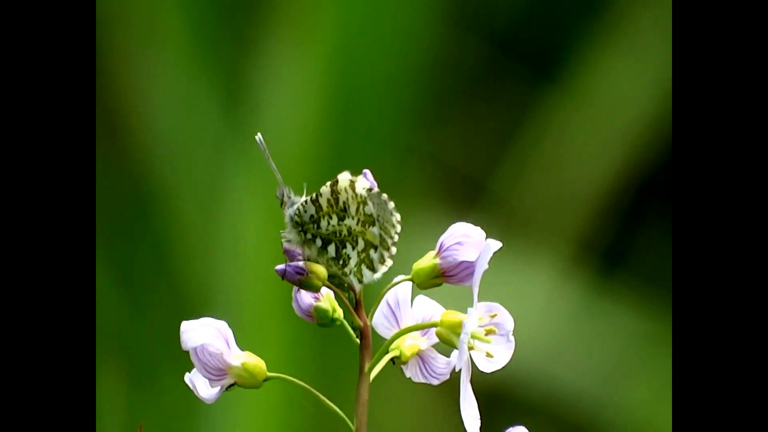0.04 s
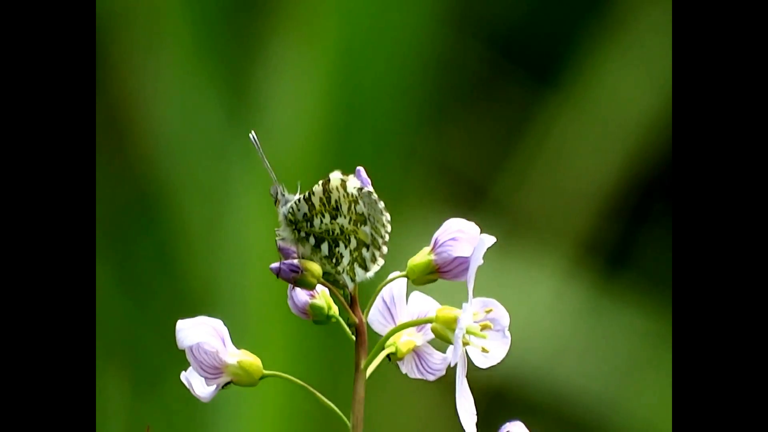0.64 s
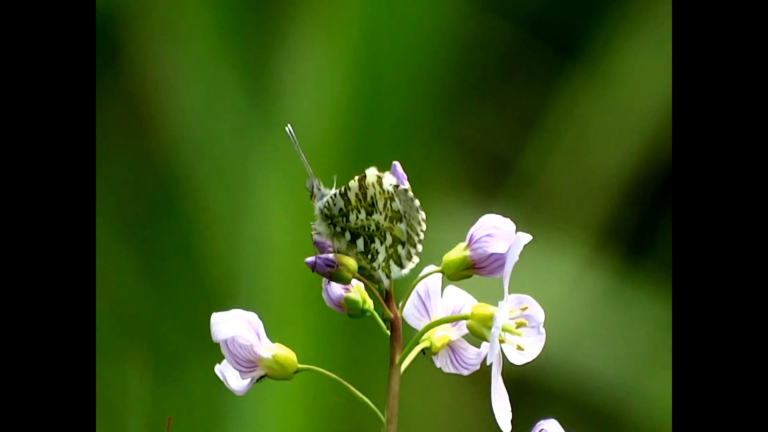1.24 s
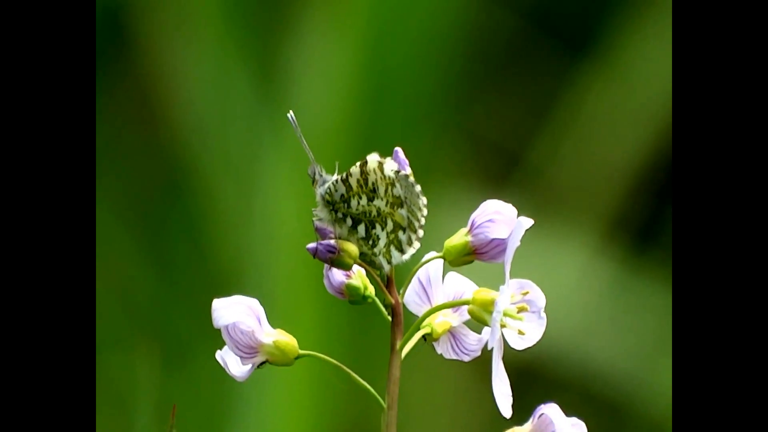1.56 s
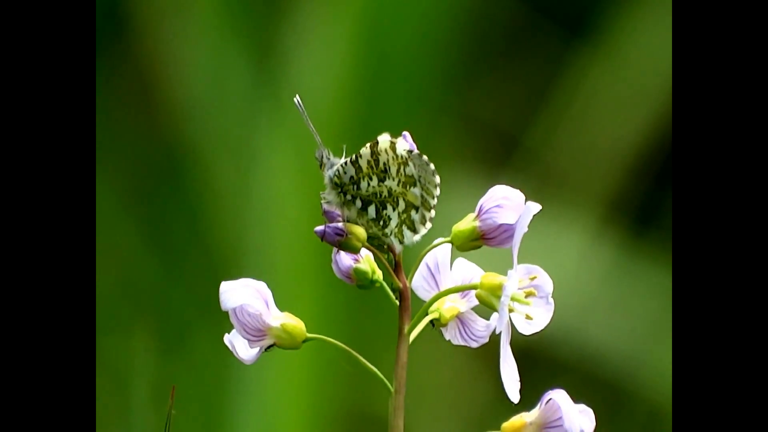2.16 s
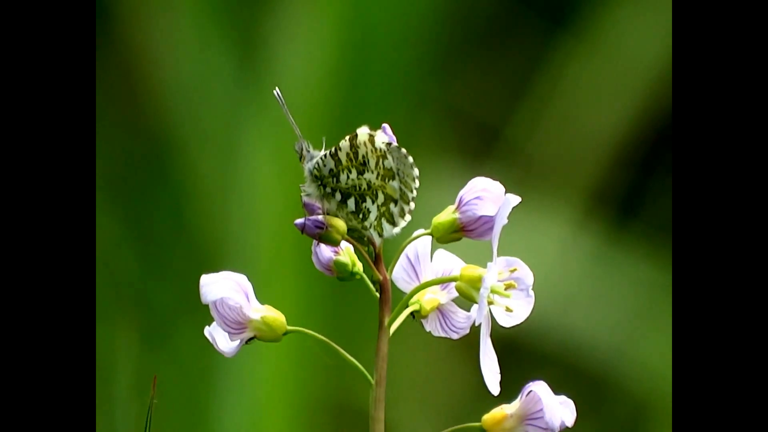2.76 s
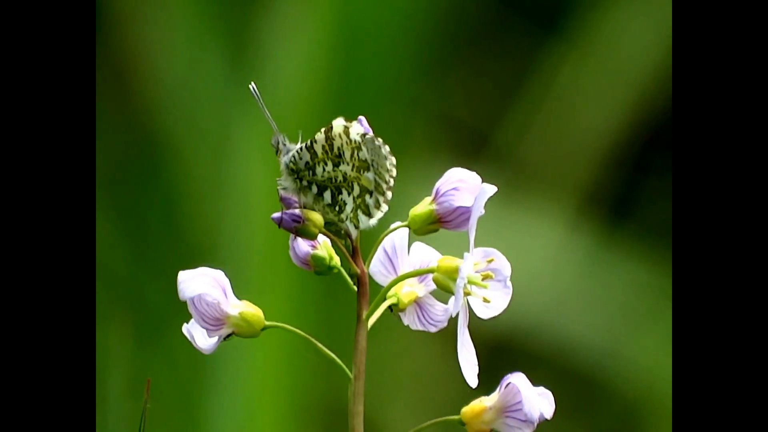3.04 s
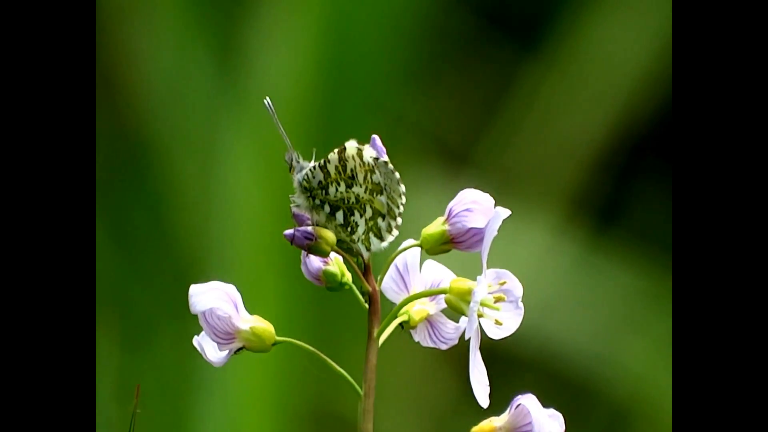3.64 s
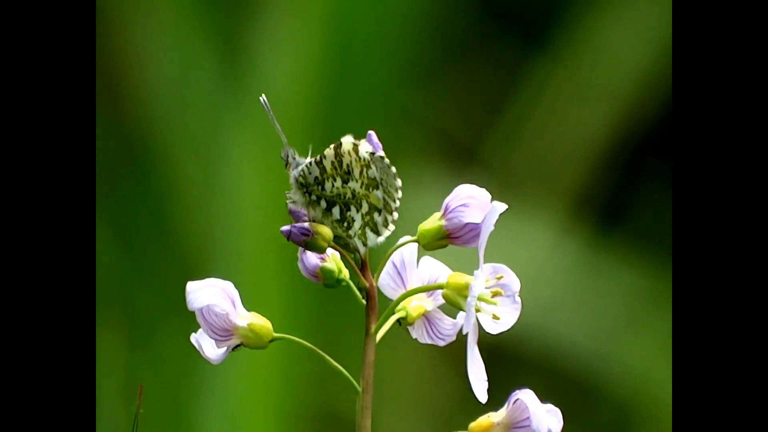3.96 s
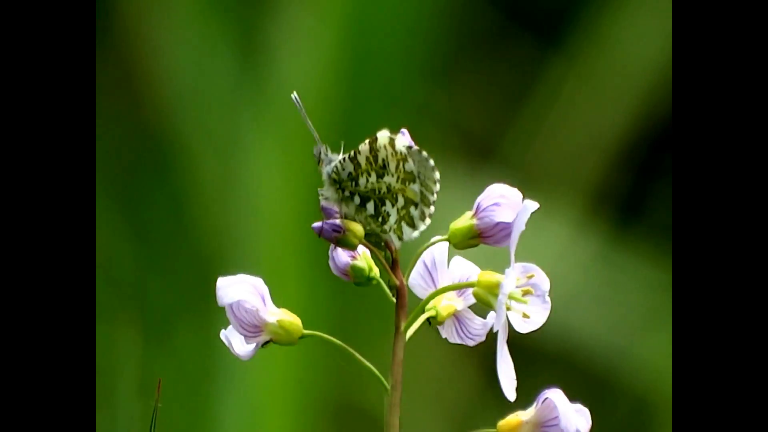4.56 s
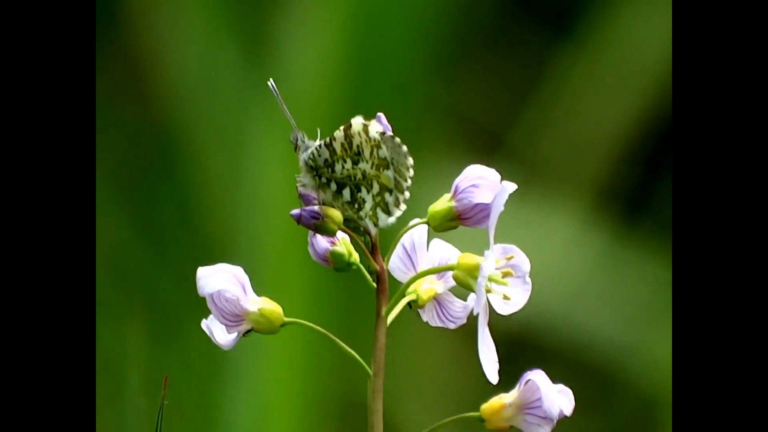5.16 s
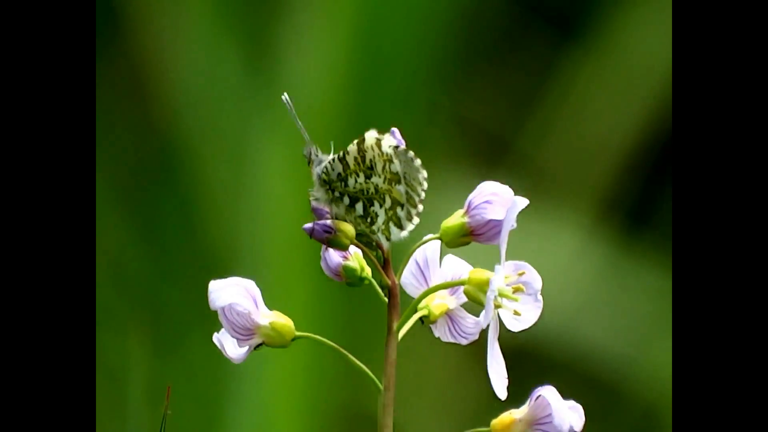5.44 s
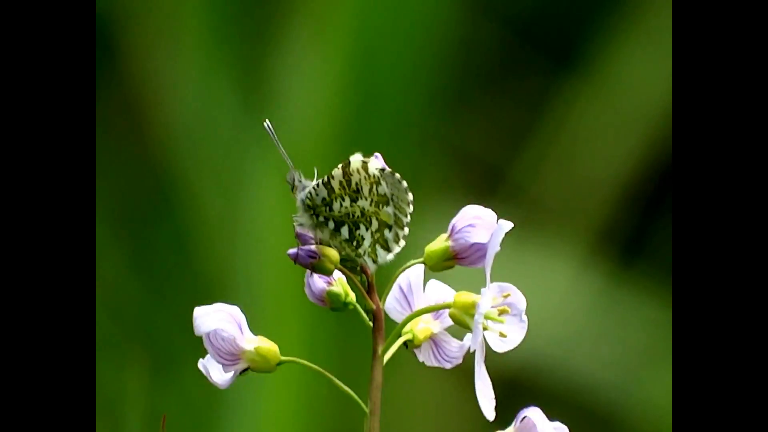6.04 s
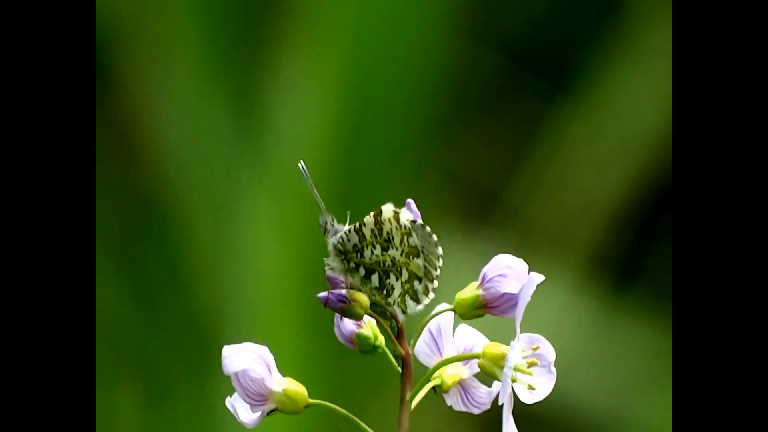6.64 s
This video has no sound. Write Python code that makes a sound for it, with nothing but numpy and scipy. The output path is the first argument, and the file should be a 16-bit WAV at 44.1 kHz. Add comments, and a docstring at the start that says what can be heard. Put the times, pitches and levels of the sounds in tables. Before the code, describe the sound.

A small songbird gives a single high whistle nearby, then leaves a few seconds to faint, faraway bird calls, gentle wind and the hiss of running water. Leaves rustle briefly at the start and again past the middle, followed by a faint hoarse sound in the distance. The near bird then sings a rising swell of arched notes, a rapid trill and bright whistles, ringing briefly among the trees.

```python
"""A damp wood opens on one thin whistle and a brief rustle of leaves, over a stream's steady hiss.
A soft rush of air in the trees sinks while far birds call, then swells again from about 4 s,
as the leaves rustle once more and something rasps faintly far off. Near by, a small songbird sings
six arched notes, a fast falling trill, then more whistles. Each note is a gliding pure tone of the
syrinx, which trunks and leaves scatter into a short tail; air, water and leaves are shaped noise."""
import sys
import numpy as np
from scipy import signal
from scipy.fft import rfft, irfft, next_fast_len
from scipy.io import wavfile
from scipy.ndimage import uniform_filter1d, map_coordinates

SR = 44100
rng = np.random.default_rng(int(sys.argv[2]) if len(sys.argv) > 2 else 0)


def generate_wav(signal):
    """Clip the signal to [-1, 1] and save it as 16-bit WAV at the path in sys.argv[1]."""
    frames = np.transpose(np.atleast_2d(signal))
    scaled = np.clip(frames, -1, 1) * 32767
    pcm = np.round(scaled).astype(np.int16)
    wavfile.write(sys.argv[1], SR, pcm)


N = 299880


def amp(db):
    """Amplitude ratio of a level: a factor of ten per 20 dB."""
    return 10 ** (np.asarray(db) / 20)

def unit_rms(x):
    """Normalisation to unit mean power."""
    return x / np.sqrt(np.mean(x ** 2) + 1e-20)

def log_interp(points, hz):
    """Interpolation of (f/Hz, value) points on a logarithmic frequency axis."""
    f, value = np.transpose(points)
    return np.interp(np.log(hz + 1), np.log(f + 1), value)

def filtered(x, response):
    """Linear filtering: the spectrum is multiplied by a frequency response."""
    size = next_fast_len(N + SR // 2)
    return irfft(rfft(x, size) * response(np.fft.rfftfreq(size, 1 / SR)), size)[..., :N]

# Likeness of the noise at left and right: f/Hz, correlation
COHERENCE = [(60, 1), (120, 0.47), (250, 0.49), (500, 0.86), (1020, 0.73), (2080, 0.7), (4230, 0.76),
             (8600, 0.76)]

def diffuse_noise(spectrum, patchy_db):
    """Partial coherence: stereo noise of rms 1, its gain patchy in time and frequency."""
    def mid_side_response(hz):
        angle = np.arccos(np.clip(log_interp(COHERENCE, hz), -1, 1)) / 2
        return amp(log_interp(spectrum, hz)) * [np.cos(angle), np.sin(angle)]
    cells = signal.stft(rng.standard_normal((2, N)), nperseg=512)[2]
    patches = uniform_filter1d(rng.standard_normal(cells.shape[1:]), size=5, axis=0)
    patches = unit_rms(uniform_filter1d(patches, size=16, axis=1))
    pair = signal.istft(cells * amp(patchy_db * patches), nperseg=512)[1][:, :N]
    mid, side = filtered(pair, mid_side_response)
    return unit_rms(np.array([mid + side, mid - side]))

# Contour of the breeze, before swing widens it about its mean: t/s, level/dB
BREEZE_CONTOUR = [(0.0, -61), (0.32, -60.5), (2.42, -68.5), (3.73, -72.5), (4.11, -71), (4.3, -69),
                  (4.98, -68.5), (6.02, -64.5), (6.23, -63), (6.8, -63.5)]
# Spectral density of air rushing in the trees: f/Hz, relative level/dB
AIR_SPECTRUM = [(53, -53.5), (90, -20.5), (129, -24.5), (188, -21), (349, -23.5), (525, -16.5), (678, 2),
                (931, -4), (1030, -4.5), (1150, -6), (1380, -4), (2160, -2.5), (2970, -6), (3300, -12),
                (4290, -29.5), (7260, -120)]

def breeze(swing=1.144, leaves_db=-4):
    """Flow noise: air rushing in the trees and a thin leaf hiss share one slow envelope."""
    times, level = np.transpose(BREEZE_CONTOUR)
    swell_db = swing * (np.interp(np.arange(N) / SR, times, level) - level.mean())
    leaf_spectrum = [(1500, -27), (3300, -3), (5500, -7), (7600, -0.5), (8800, -10), (11000, -25)]
    leaves = diffuse_noise(leaf_spectrum, patchy_db=2.5)
    air = diffuse_noise(AIR_SPECTRUM, patchy_db=1.97)
    return amp(level.mean() + swell_db) * (air + amp(leaves_db) * leaves)

# Spectral density of running water: f/Hz, relative level/dB
WATER_SPECTRUM = [(25, -39.5), (65, -19), (110, -24.5), (320, -23), (540, -11), (690, -4.5), (1050, -21.5),
                  (2400, -14.5), (3500, -10.5), (5800, -12), (7500, -7.5), (8800, -19.5), (11000, -29)]

def stream(level_db=-71):
    """Stationary noise: running water hisses, and a spectral peak near 690 Hz sounds hollow."""
    return amp(level_db) * diffuse_noise(WATER_SPECTRUM, patchy_db=3.0)

def burst(start_s, attack_s, hold_s, t60):
    """Transient envelope: linear rise, hold, then exponential decay of 60 dB in t60 seconds."""
    t = np.arange(N) / SR - start_s
    return np.clip(t / attack_s, 0, 1) * amp(-60 * np.maximum(t - attack_s - hold_s, 0) / t60)

# Brief rustles in the leaves: t/s, level/dB
RUSTLE_EVENTS = [(-.02, -56.5), (4.12, -60)]
# Spectral densities of leaves brushing and settling: f/Hz, relative level/dB
BRUSH_SPECTRUM = [(240, -58), (400, -28.5), (831, -1), (1110, -8), (1200, -15), (2180, -4.5), (2980, -11.5),
                  (3980, -5.5), (8150, -5.5), (9050, -18), (11800, -43.5), (19900, -120)]
SETTLE_SPECTRUM = [(700, -19.5), (1500, -7.5), (2150, 3.5), (3000, -10), (5000, -12), (9000, -32)]

def rustles(lead_s=0.068, settle_db=-9):
    """Amplitude-modulated noise: each bright brush of leaves lies inside a softer, duller stir."""
    brush = stir = 0
    for s, db in RUSTLE_EVENTS:
        brush += amp(db) * burst(s, attack_s=0.015, hold_s=0.031, t60=0.54)
        stir += amp(db + settle_db) * burst(s - lead_s, attack_s=0.061, hold_s=0.23, t60=0.9)
    bright = brush * diffuse_noise(BRUSH_SPECTRUM, patchy_db=1.5)
    dull = stir * diffuse_noise(SETTLE_SPECTRUM, patchy_db=5.0)
    return bright + dull

def wobble(rate_hz, size):
    """Slow random modulation: a spline through Gaussian values drawn at rate_hz."""
    knots = rng.standard_normal(int(size * rate_hz / SR) + 4)
    return map_coordinates(knots, [np.arange(size) * rate_hz / SR])

# Gestures of the syrinx, by name: fraction of the duration, frequency ratio, relative level/dB
SYRINX_GESTURES = { "arch": [(0, .76, -20.5), (.07, .94, 1), (.14, 1.012, 2), (.26, 1.008, -5),
                   (.46, .985, 0), (.68, .94, 1.5), (.88, .85, 5), (1, 0.794, -5.5)],
                   "sweep": [(0, 1.092, -13.5), (.25, 1.07, 0.5), (.42, .96, -1), (.68, 0.83, -4),
                   (1, 0.8, -13.5)], "hook": [(0, 1.04, -17), (.15, .96, -9), (.38, .958, -3), (.54, 1, 3),
                   (.74, 1.03, -1), (1, 1.06, -11)], "whistle": [(0, .98, -28), (.07, .92, -8),
                   (.22, .98, -1), (.48, 1.009, -5), (.7, .99, -7.5), (.9, .94, -2), (1, .895, -6.5)],
                   "peak": [(0, .94, -12), (.22, .975, -6.5), (.52, 1.018, -13), (.68, .98, -5.5),
                   (.82, .935, -1.5), (1, 0.862, -8)], "chip": [(0, .87, -3), (.18, .99, -11.5),
                   (.38, 1.008, 0), (.55, .97, 0.5), (.72, .875, -1), (1, .78, -6.5)],
                   "rise": [(0, .96, -6.5), (.3, .99, -0.5), (.6, 1.09, -0.5), (1, 1.306, 1.5)],
                   "flick": [(0, 1.1, -11.5), (.6, 0.93, 0), (1, 1.3, -10)], "slur": [(0, .94, -10),
                   (.3, .955, -4), (.8, 1.05, 0), (1, 1.08, -6)], "upslur": [(0, .8, -15), (.15, .76, -11),
                   (.45, .81, -8), (.78, 1, 2.5), (1, 1.11, -1)], "droop": [(0, 1.03, -1.5),
                   (.3, 1.003, -1), (.75, .995, -0.5), (1, .962, -11)], "pipe": [(0, 1.025, -9),
                   (.25, 1.002, -1), (.75, .998, -2.5), (1, 0.97, -13.5)], "fall": [(0, 1.07, -7),
                   (.4, 1.01, -0.5), (1, .93, -6)], "lift": [(0, .955, -9), (.35, .985, 0), (1, 1.01, -3)],
                   }

def syrinx(length, hz, gesture, waver, waver_hz=250, shimmer_db=1.22, shimmer_hz=110, edge_s=0.00097):
    """Frequency and amplitude modulation: a pure tone glides, a little unsteadily, through a gesture."""
    t = np.arange(int(length * SR)) / SR
    fraction, ratio, level = np.transpose(SYRINX_GESTURES[gesture])
    glide = uniform_filter1d(np.interp(t / length, fraction, ratio), size=len(t) // 10, mode="nearest")
    pitch = hz * glide * (1 + waver * wobble(waver_hz, len(t)))
    envelope = amp(np.interp(t / length, fraction, level) + shimmer_db * wobble(shimmer_hz, len(t)))
    gate = np.sin(np.pi / 2 * np.clip(np.minimum(t, length - t) / edge_s, 0, 1)) ** 2
    return np.sqrt(2) * gate * envelope * np.sin(2 * np.pi * np.cumsum(pitch) / SR)

# Reverberation time of the wood: f/Hz, T60/s
WOOD_T60 = [(3000, 0.65), (5000, 0.65), (8000, 0.62)]

def scatter(early_db=3, early_s=0.0028, side_db=-16):
    """Scattering as an impulse response: a burst off nearby leaves, then a tail from the trunks."""
    hz, t, cells = signal.stft(rng.standard_normal((2, int(SR * 0.7))), SR, nperseg=256)
    decay = amp(-60 * t / log_interp(WOOD_T60, hz)[:, None] + early_db * np.exp(-t / early_s))
    mid, side = signal.istft(cells * decay, SR, nperseg=256)[1]
    return np.array([mid + amp(side_db) * side, mid - amp(side_db) * side]) / np.linalg.norm(mid)

def add(track, s, sound):
    """Superposition: a stereo sound is summed into the track from time s."""
    start = round(s * SR)
    part = sound[:, max(-start, 0):max(N - start, 0)]
    track[:, max(start, 0):][:, :part.shape[1]] += part

def sing_in_wood(notes, direct_db, ground_db, wood_db, left_db, wood_left_db, waver, ground_s=0.0023):
    """Multipath propagation: each note arrives directly, off the ground, and by scattered paths."""
    track = np.zeros((2, N))
    wood_gain = amp(wood_db + np.array([[wood_left_db], [-wood_left_db]]) / 2)
    pan = amp(np.array([left_db, -left_db]) / 2)
    trunks = scatter()
    for s, length, hz, db, gesture in notes:
        leaves = scatter()  # trunks stay put, leaves move between notes
        paths = wood_gain * (trunks + leaves) / np.sqrt(2)
        paths[:, 0] += amp(direct_db) * pan
        paths[:, round(ground_s * SR)] += amp(ground_db) * pan  # beats against a gliding note
        tone = amp(db) * syrinx(length, hz, gesture, waver)
        add(track, s, signal.fftconvolve(tone[None], paths, axes=1))
    return track

def note_run(gesture, count, start_s, period_s, length_s, hz, step_hz, db, step_db):
    """Periodic repetition: one gesture recurs, its frequency and level changing in equal steps."""
    return [(start_s + k * period_s, length_s, hz + k * step_hz, db + k * step_db, gesture)
            for k in range(count)]

# The near bird's single notes: t/s, duration/s, f/Hz, level/dB, gesture
NEAR_NOTES = [ (-.01, 0.089, 7594, -32, "droop"), (4.543, 0.036, 6680, -57, "slur"),
              (4.644, 0.032, 4630, -58, "fall"), (5.556, 0.041, 4590, -42, "pipe"),
              (5.640, 0.048, 7720, -32, "hook"), (6.191, 0.049, 6680, -31.5, "chip"),
              (6.292, .106, 3793, -46, "upslur"), (6.436, .13, 7960, -29.5, "whistle"),
              (6.660, 0.075, 8134, -28, "peak"), ]
# Rising notes that end its two-part syllables: t/s, f/Hz, level/dB
RISING_NOTES = [(6.619, 4970, -33.5), (6.792, 5130, -32)]

def near_bird(flick_lead_s=0.016, flick_s=0.007, flick_hz=5980, flick_db=-3.5, rise_s=0.029):
    """A near source, a little to the left: direct sound is about as strong as the reverberation."""
    arches = note_run("arch", count=6, start_s=4.7135, period_s=0.1388, length_s=0.098,
                      hz=7168, step_hz=-31.5, db=-50.5, step_db=3)
    trill = note_run("sweep", count=11, start_s=5.7072, period_s=0.0432, length_s=0.0195,
                     hz=5113, step_hz=-32, db=-41, step_db=0.4457)
    notes = arches + trill + list(NEAR_NOTES)
    for s, hz, db in RISING_NOTES:
        notes.append((s - flick_lead_s, flick_s, flick_hz, db + flick_db, "flick"))
        notes.append((s, rise_s, hz, db, "rise"))
    return sing_in_wood(notes, direct_db=-1.3, ground_db=-13.5, wood_db=-1.75,
                        left_db=3.0, wood_left_db=2.0, waver=0.0038)

# One far bird's upward slur, about once a second: t/s, level/dB
FAR_SLURS = [(0.593, -58), (1.535, -61), (2.635, -66.5), (3.894, -66.5)]
# Thin whistles deeper in the wood: t/s, duration/s, f/Hz, level/dB, gesture
FAR_WHISTLES = [ (1.02, 0.21, 7150, -65, "pipe"), (1.31, 0.14, 7660, -58, "lift"),
                (1.47, 0.15, 7690, -63.5, "droop"), (1.58, 0.12, 7090, -62, "pipe"),
                (1.67, 0.068, 4360, -66.5, "lift"), (1.78, .06, 4596, -68, "lift"),
                (1.99, 0.091, 4540, -68.5, "pipe"), (2.23, 0.16, 3860, -72, "droop"),
                (2.42, 0.067, 3120, -68, "droop"), (2.44, 0.15, 6970, -68, "pipe"),
                (2.6, 0.13, 3130, -72, "droop"), (2.86, .13, 5150, -72.5, "pipe"),
                (3.2, 0.15, 4625, -70.5, "droop"), (3.55, 0.14, 4590, -71.5, "droop"),
                (4.28, 0.092, 4670, -72.5, "droop"), (6.285, .028, 3470, -58, "fall"), ]

def far_birds(slur_s=0.075, slur_hz=3990, twitter_s=0.097, twitter_db=-76):
    """Distant sources: reverberation outweighs the direct sound of slurs, whistles and faint twitter."""
    notes = [(s, slur_s, slur_hz, db, "slur") for s, db in FAR_SLURS] + list(FAR_WHISTLES)
    for when, height in rng.random((12, 2)):
        s = np.interp(when, (0, 1), (1.95, 2.5))
        hz = np.interp(height, (0, 1), (4970, 7580))
        notes.append((s, twitter_s, hz, twitter_db, "lift"))
    return sing_in_wood(notes, direct_db=-3.5, ground_db=-19.5, wood_db=1,
                        left_db=2.0, wood_left_db=-0.8, waver=0.009)

# Spectral density of a hoarse sound far off: f/Hz, relative level/dB
RASP_SPECTRUM = [(700, -38), (1100, -14), (1280, -2), (1580, -8), (1800, -15), (2300, -8), (3300, -29),
                 (6000, -57)]

def rasp(level_db=-64):
    """A noise transient with two spectral peaks, heard as one faint, hoarse sound."""
    envelope = burst(start_s=4.52, attack_s=0.027, hold_s=0.05, t60=0.78)
    return amp(level_db) * envelope * diffuse_noise(RASP_SPECTRUM, patchy_db=3)

def scene():
    """Superposition of independent sources: birdsong over noise from all around."""
    birds = near_bird() + far_birds()
    background = breeze() + stream() + rustles() + rasp()
    return birds + background * amp([[0.3], [-0.3]])  # slightly stronger on the left

def record(dry, cutoff_hz=11000):
    """Band limiting: the recorder acts as an ideal low-pass filter."""
    return filtered(dry, lambda hz: hz < cutoff_hz)

dry = scene()
out = record(dry)
generate_wav(out)
```